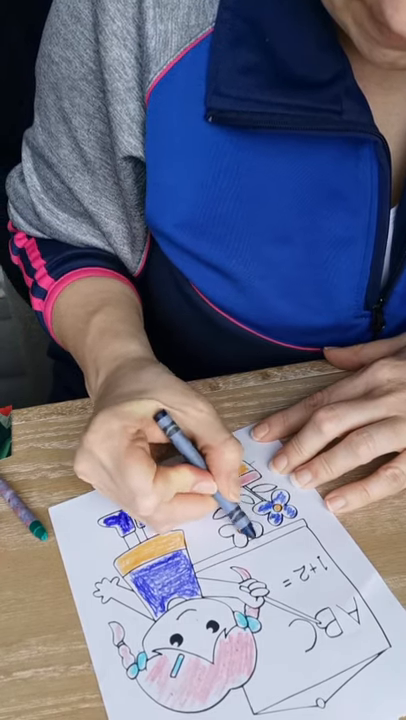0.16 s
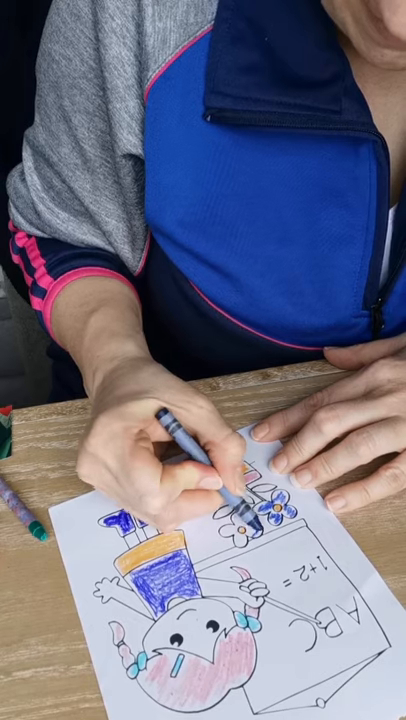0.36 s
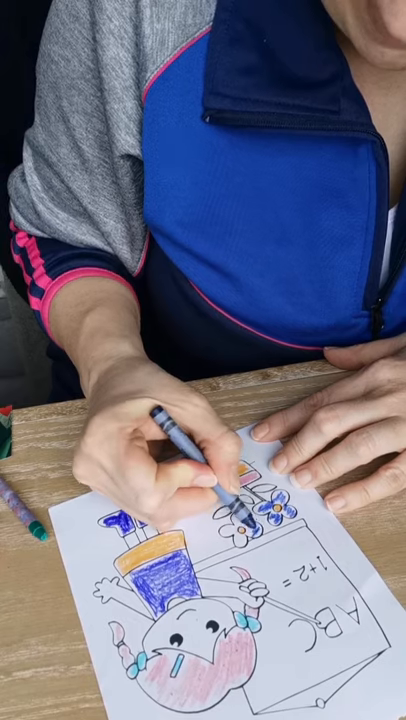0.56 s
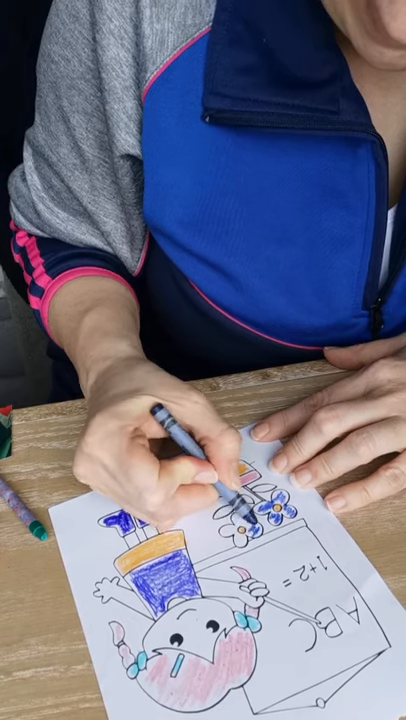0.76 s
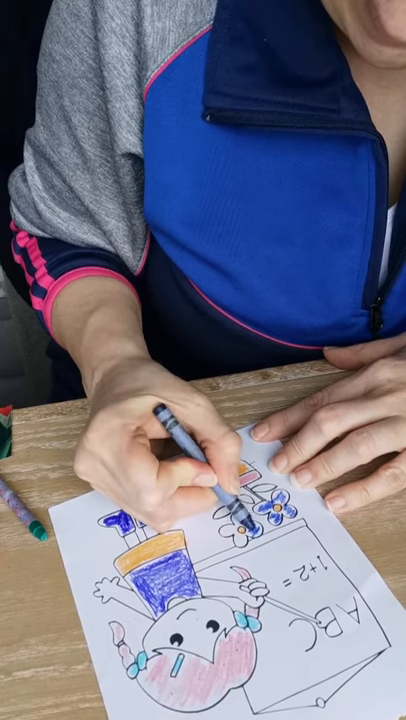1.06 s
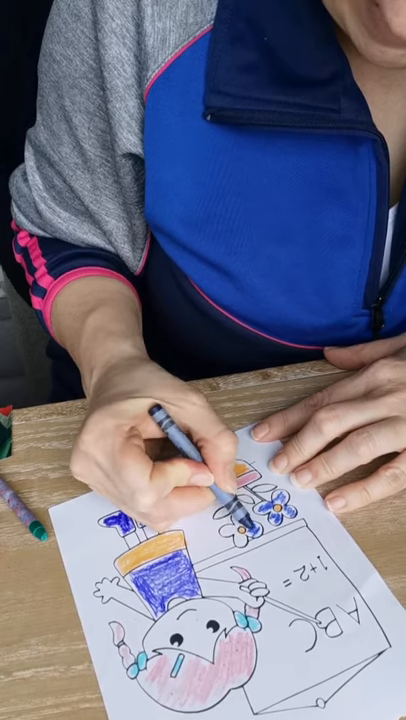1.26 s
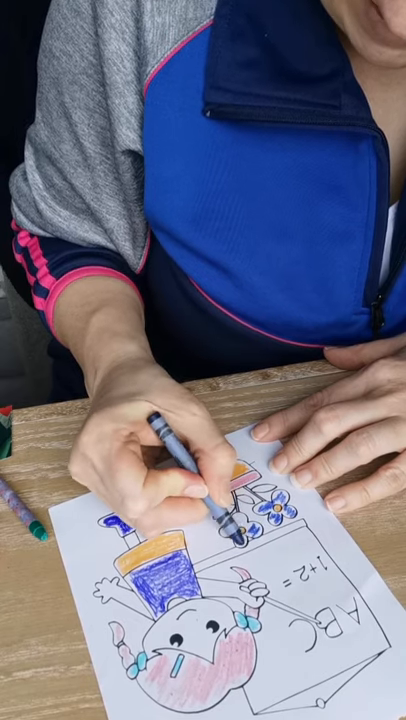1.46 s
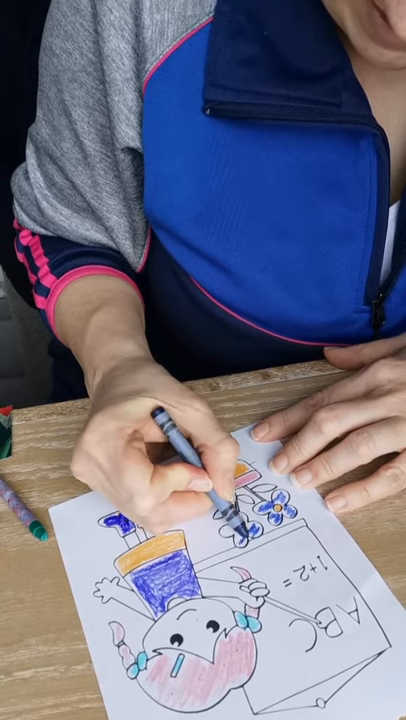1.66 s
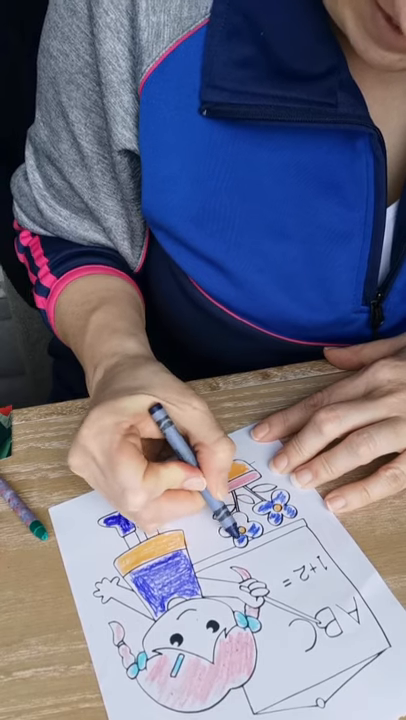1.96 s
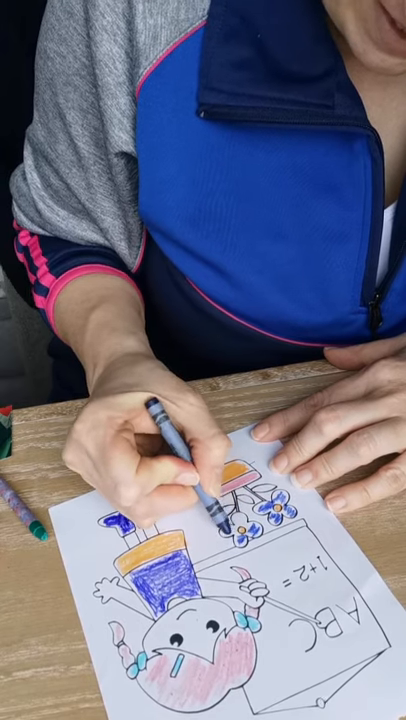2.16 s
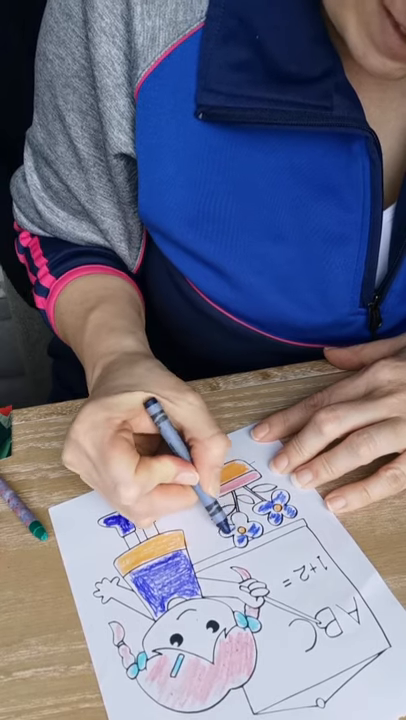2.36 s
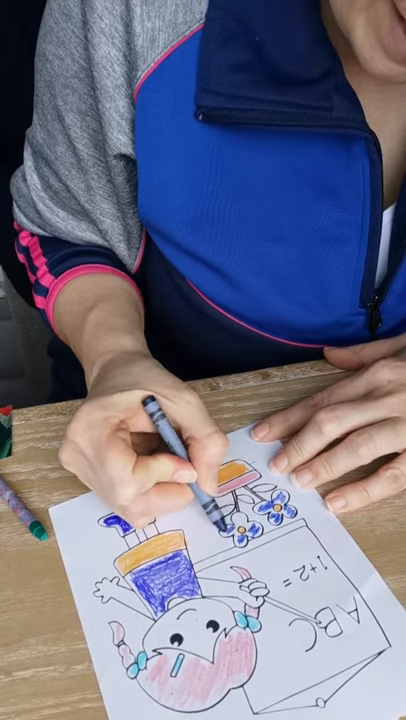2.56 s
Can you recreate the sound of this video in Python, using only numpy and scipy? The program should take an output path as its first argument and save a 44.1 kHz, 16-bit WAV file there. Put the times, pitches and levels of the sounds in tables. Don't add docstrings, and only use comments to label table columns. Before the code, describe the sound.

Crayon rubbing rapidly back and forth on paper, with three small taps on a wooden desk

```python
import sys
import numpy as np
from scipy import signal
from scipy.fft import rfft, irfft
from scipy.io import wavfile

SR = 44100
rng = np.random.default_rng(int(sys.argv[2]) if len(sys.argv) > 2 else 0)


def int16_out(signal):
    q = np.round(np.clip(np.atleast_2d(signal).T, -1, 1) * 32767)
    wavfile.write(sys.argv[1], SR, q.astype(np.int16))


def boost(x):
    u = np.asarray(x, float) / 20
    return 10 ** u


N = 119070

# start [t/s], length [t/s], hiss [level/dB], desk shake [level/dB]
STROKES = [(0, 0.046, -72.5, -54), (0.08, 0.11, -73.5, -62), (0.258, 0.068, -71, -37),
           (0.345, 0.076, -62.5, -44), (0.413, 0.12, -78, -53.5), (0.527, 0.078, -67, -52),
           (0.593, 0.095, -70.5, -68), (0.697, 0.068, -65.5, -50), (0.75, 0.11, -72, -59.5),
           (0.867, 0.082, -63.5, -49.5), (0.977, 0.057, -70.5, -45.5), (1.062, 0.036, -74, -64),
           (1.135, 0.078, -72.5, -49.5), (1.215, 0.062, -74.5, -54), (1.303, 0.071, -68.5, -61),
           (1.371, 0.039, -70, -52.5), (1.614, 0.062, -63, -41), (1.682, 0.11, -73, -56),
           (1.805, 0.068, -62.5, -46.5), (1.876, 0.11, -70.5, -57.5), (1.975, 0.065, -62, -49.5),
           (2.067, 0.069, -69.5, -65), (2.15, 0.04, -71.5, -44), (2.189, 0.098, -66, -52.5),
           (2.368, 0.077, -66.5, -43), (2.44, 0.11, -66.5, -61.5), (2.554, 0.094, -64, -48.5),
           (2.642, 0.071, -65, -61)]
STROKE_HUM_DB = [-0.5, 3, -4.5, -7.5, -1.5, -3, 1.5, 0.5, 4, 0, -4.5, 3, 0.5, 3.5, -2.5, -17, -1.5, 4.5,
                 -3.5, -1, -2.5, 0.5, -4, -6.5, 1, 0.5, -2, 0.5]
STROKE_WEIGHT_DB = [-49, -61, -43, -55, -53, -58, -65, -63, -70, -70, -64, -54, -58, -62, -62, -71, -51,
                    -54, -53, -63, -48, -61, -53, -69, -56, -66, -51.5, -65]
# [f/Hz], [level/dB]
SLIDE_COLOUR = [(530, -53), (900, -36), (1150, -10.5), (1260, -21), (2120, -15), (4740, -9.5), (6560, -6),
                (11800, -10), (16000, -9)]
# [f/Hz], [level/dB]
HISS_COLOUR = [(760, -27), (1300, 3), (1800, -2), (2040, -3.5), (3560, -8), (6910, -2), (16000, -6.5)]
# [f/Hz], width [f/Hz], [level/dB]
SHEET = [(4360, 270, 2), (4690, 150, -5.5), (5290, 160, -4.5), (6730, 330, 0.5), (7100, 240, 2),
         (7490, 150, -1), (8300, 370, -6.5), (11180, 720, -2.5)]
# [f/Hz], width [f/Hz], [level/dB]
CRAYON_HUM = [(609, 69, 0.5), (1176, 50, 7.5), (1678, 24, 0.5), (2072, 73, 0.5), (2337, 32, 0.5),
              (1610, 3800, -11.5)]
# [t/s], desk [level/dB], crayon [level/dB], snap [level/dB], hardness [f/Hz]
TAPS = [
    (0.1999, -30, -37.5, -47, 3500),
    (1.5338, -31.5, -35.5, -45.5, 5900),
    (2.3257, -33.5, -43, -55.5, 2440),
]
# [t/s], [level/dB], centre [f/Hz]
JOLTS = [(.003, -56.5, 109.5), (.15, -58, 143), (0.256, -57, 95), (.295, -52, 95), (0.356, -47, 191),
         (.365, -45, 94), (.449, -44, 98), (0.544, -55, 210), (0.569, -51, 107), (.65, -65, 99),
         (.696, -43.5, 113), (.716, -49, 174), (0.758, -50, 110), (0.867, -46.5, 137), (.91, -48, 162),
         (.935, -49, 190), (.969, -42, 125), (.994, -50, 125), (1.029, -49, 111), (1.061, -55, 108),
         (1.133, -48, 122), (1.157, -52, 136), (1.18, -52, 134), (1.239, -54.5, 129), (1.3, -52, 116),
         (1.367, -59, 121), (1.418, -65, 124), (1.621, -44, 136), (1.644, -44.5, 100), (1.674, -50, 115),
         (1.801, -47.5, 110.6), (1.838, -51.5, 150), (1.891, -55.5, 135), (1.972, -58.5, 100),
         (2.0, -56.5, 153), (2.017, -51, 111), (2.048, -55.5, 100), (2.153, -48, 178), (2.182, -45, 128),
         (2.213, -52.5, 152), (2.239, -53.5, 159), (2.375, -36, 109), (2.417, -60, 101),
         (2.455, -55.5, 193), (2.559, -51, 118), (2.582, -50.5, 112), (2.612, -53.5, 140),
         (2.641, -59, 132)]
# [f/Hz], tapped [level/dB], rubbed [level/dB], time to fall 60 dB [t/s],
# change from tap to tap as the tip moves along [level/dB]
DESK = [(100.8, -10, -8.5, 0.26, 0), (104.3, -33, -1.5, 0.15, 15), (134.2, -4, -4, 0.39, 2),
        (165.5, -11.5, -1, 0.044, 0), (186.9, -10.5, -11, 0.39, 3), (211.7, 0, -8, 0.15, 0.5),
        (258.4, -4.5, -41, 0.084, 1), (343.4, -12.5, -10.5, 0.097, -0.5), (367.5, -1.5, -10, 0.051, 1.5),
        (427, -26, -7.5, 0.048, -11), (575, -7, -4.5, 0.1, 0), (695, -8, -16, 0.05, 1),
        (748, -4, -2, 0.053, 1.5), (847, -7.5, -1.5, 0.049, 1)]
# [f/Hz], [level/dB], time to fall 60 dB [t/s], change from tap to tap [level/dB]
CRAYON_RING = [(1169, -0.5, 0.045, 4), (1310, -14, 0.03, -11), (1612, 8, 0.015, 0), (2085, 1, 0.057, 4.5),
               (2113, 3, 0.03, -0.5), (2316, 8.5, 0.033, -1), (2565, 2, 0.023, 3), (2770, 2, 0.024, .5),
               (3157, -2, 0.028, 2), (3340, -17, 0.015, 1), (4305, 3.5, 0.024, -6), (4720, 2, 0.032, 5),
               (5270, -5.5, 0.066, -18), (7080, 14, 0.014, -1)]
# middle [t/s], [level/dB], centre [f/Hz], length [t/s]
CRACKLES = [
    (0.58, -51, 11900, 0.0071),
    (0.599, -59, 10400, 0.0053),
    (1.504, -57, 12200, 0.004),
    (2.204, -67, 5000, .008),
    (2.417, -50.5, 8200, .014),
    (2.56, -70, 3980, 0.0072),
    (2.611, -50, 7000, 0.012),
]
# [f/Hz], [level/dB]
AIR_COLOUR = [(35, -36), (60, 8), (540, -14), (882, -16), (1550, -19), (3040, -21.5), (3580, -22),
              (6000, -27.5), (16000, -24)]
# [f/Hz], [level/dB], time to fall 60 dB [t/s]
TAIL = [(382, -11.5, 0.2), (690, -22.5, 0.31), (1144, -14, 0.13), (1730, -23.5, 0.21), (2440, -23, 0.24),
        (3520, -20, 0.15), (5060, -24, 0.21), (8900, -80, .15)]
# [f/Hz], [level/dB]
LEFT_COLOUR = [(300, -1), (700, -6.5), (1290, -15), (2380, -10), (4400, -9), (8120, -18.5), (15000, -16)]

AIR_DB, SWAY_FOLLOW_DB = -68.5, -1
SWAY_HZ, SWAY_WIDTH_HZ, SWAY_DB = 45.9, 6.9, -61
RISE_S, FALL_S, SWELL_DB = 0.015, 0.028, 4
GRAINS_PER_S, GRAIN_SPREAD_DB, PATCHY_DB = 6000, -3.5, 1.3
SCRAPE_DB = -7
JOLT_HZ, JOLT_WIDTH, JOLT_EDGE_DB = 308, 0.82, -22
STUTTER_HZ, STUTTER_DB = 264, -53.5
TAP_HZ, DESK_CUT_HZ, SHARED_BELOW_HZ = 984, 74.7, 240
PRESSED_DAMPING = 0.67
ROOM_T60_S, WALL_HZ, ROOM_DB = 0.4, 3500, -21.5
SLIDE_START_S, SLIDE_LENGTH_S, SLIDE_DB = 0.042, 0.13, -49.5
SLIDE_RISE_S, SLIDE_FALL_S = 0.029, 0.063
TAP_SCATTER_DB, SECOND_TOUCH_S, SECOND_TOUCH_DB = 0.8, 0.0016, -9
SNAPS_PER_S, SNAP_SPREAD_DB, SNAP_WIDTH = 20000, 1.5, 0.55
LEFT_LAG_S, DESK_LAG_S = 0.000382, 0.0001
DESK_LEFT_DB, HIGH_DESK_LEFT_DB, OWN_LEFT_DB = 1.38, -5.5, -5.5
TOP_HZ = 15900


def rms_one(x):
    return x / np.sqrt(np.mean(x ** 2) + 1e-20)


def drift(rate):
    r = np.exp(-80 * np.pi * rate / SR)
    slow = signal.lfilter([1], [1, -2 * r, r * r], rng.standard_normal(N // 40 + 2002))[2000:]
    return np.interp(np.arange(N) / 40, np.arange(len(slow)), rms_one(slow))


def colour(x, points):
    hz, db = np.transpose(points)
    f = np.maximum(np.arange(N // 2 + 1) * SR / N, 1)
    gain = boost(np.interp(np.log(f), np.log(hz), db))
    return irfft(rfft(x) * gain, N)


def ring(x, hz, t60):
    r = boost(-60 / (t60 * SR))
    w = 2 * np.pi * hz / SR
    return signal.lfilter([0, np.sin(w)], [1, -2 * r * np.cos(w), r * r], x + 1e-18)


def resonance(x, hz, width_hz):
    r = np.exp(-np.pi * width_hz / SR)
    top = [(1 - r * r) / 2, 0, (r * r - 1) / 2]
    bottom = [1, -2 * r * np.cos(2 * np.pi * hz / SR), r * r]
    return signal.lfilter(top, bottom, x + 1e-18)


def soften(x, hz):
    r = np.exp(-2 * np.pi * hz / SR)
    return signal.lfilter([(1 - r) ** 2], [1, -2 * r, r * r], x + 1e-18)


def shape(start, length, rise, fall):
    out = np.zeros(N)
    first = max(int(start * SR), 0)
    t = np.arange(first, min(int((start + length) * SR), N)) / SR - start
    ramp = np.clip(np.minimum(t / rise, (length - t) / fall), 0, 1)
    out[first:first + len(t)] = np.sin(np.pi / 2 * ramp) ** 2
    return out


def clicks(s, db):
    out = np.zeros(N)
    out[(np.asarray(s) * SR).astype(int)] = boost(np.asarray(db))
    return out


def grains(rate, spread_db):
    sizes = boost(spread_db * np.minimum(rng.exponential(1, N), 5)) * rng.choice([-1, 1], N)
    return rms_one(sizes * (rng.random(N) < rate / SR))


def later(x, s):
    return np.interp(np.arange(N) - s * SR, np.arange(N), x)


def air():
    one, left, right = rng.standard_normal((3, N))
    low = soften(one, 380)
    both = np.array([low + v - soften(v, 600) for v in (left, right)])
    tone = boost(AIR_DB + 0.54 * drift(27)) * rms_one(colour(both, AIR_COLOUR))

    push = sum(boost(weight_db + SWAY_FOLLOW_DB) * shape(start, length, 0.023, 0.024)
               for (start, length, _, _), weight_db in zip(STROKES, STROKE_WEIGHT_DB))
    wobble = np.sign(resonance(one[::-1], SWAY_HZ, SWAY_WIDTH_HZ)) * np.sqrt(SWAY_WIDTH_HZ / SR)
    drive = (boost(SWAY_DB + 2.0 * drift(3.2)) + push) * wobble
    sway = resonance(resonance(drive, SWAY_HZ, SWAY_WIDTH_HZ), SWAY_HZ, 3.9 * SWAY_WIDTH_HZ)
    sway = sway * np.sqrt(SR / SWAY_WIDTH_HZ) * 0.52
    sway = sway + 0.22 * np.roll(sway, SR) * [[1], [-1]]
    return tone + sway * boost(np.array([[0.8], [0]]))


def rubbing():
    t = np.arange(N) / SR
    pressure = np.zeros(N)
    for start, length, db, _ in STROKES:
        swell_db = SWELL_DB * np.clip((t - start) / length - 0.5, -1, 1)
        pressure += boost(db + swell_db) * shape(start, length, RISE_S, FALL_S)
    tooth = colour(grains(GRAINS_PER_S, GRAIN_SPREAD_DB), HISS_COLOUR)
    broad = np.zeros(N)
    for k, hz in enumerate(np.geomspace(1200, 15500, 11)):
        broad += (-1) ** k * boost(PATCHY_DB * drift(8.6)) * resonance(tooth, hz, 0.42 * hz)
    sheet = sum(boost(db + 2.7 * drift(7.4)) * resonance(tooth, hz, width) for hz, width, db in SHEET)
    return pressure * boost(0.5 * drift(100)) * rms_one(0.68 * broad + sheet)


def scraping():
    push = sum(boost(0.59 * hiss_db + 0.39 * shake_db + hum_db) * shape(start, length, 0.014, 0.022)
               for (start, length, hiss_db, shake_db), hum_db in zip(STROKES, STROKE_HUM_DB))
    tooth = grains(3000, 2.47)
    hum = sum(boost(db + 2.0 * drift(15.5)) * resonance(tooth, hz, width) for hz, width, db in CRAYON_HUM)
    return boost(SCRAPE_DB) * push * rms_one(hum)


def desk():
    push = sum(boost(db) * shape(start, length, 0.0077, 0.052) for start, length, _, db in STROKES)
    rub = boost(STUTTER_DB) * push * rms_one(soften(grains(600, 0.56), STUTTER_HZ))
    rub -= boost(JOLT_EDGE_DB) * soften(clicks(*np.transpose(JOLTS)[:2]), JOLT_HZ)
    for s, db, hz in JOLTS:
        rub -= resonance(resonance(clicks([s], [db]), hz, JOLT_WIDTH * hz), hz, JOLT_WIDTH * hz)

    tap_s, tap_level_db = np.transpose(TAPS)[:2]
    place = np.arange(len(tap_s)) - 1
    out = np.zeros((2, N))
    for hz, tap_db, rub_db, t60, move_db in DESK:
        row = int(hz > SHARED_BELOW_HZ)
        tap = -soften(clicks(tap_s, tap_level_db + move_db * place), TAP_HZ)
        out[row] += ring(boost(tap_db) * tap, hz, t60)
        out[row] += ring(boost(rub_db) * rub, hz, PRESSED_DAMPING * t60)
    return signal.sosfilt(signal.butter(3, DESK_CUT_HZ, "high", fs=SR, output="sos"), out)


def room(x):
    out = np.zeros((2, N))
    dull = np.exp(-2 * np.pi * WALL_HZ / SR)
    for k, lag in enumerate((rng.uniform(0.0072, 0.04, 16) * SR).astype(int)):
        loop, state = x.copy(), [0.]
        gain = boost(-60 * lag / SR / ROOM_T60_S)
        for i in range(lag, N, lag):
            back, state = signal.lfilter([gain * (1 - dull)], [1, -dull], loop[i - lag:i], zi=state)
            loop[i:i + lag] += back[:N - i]
        out[k % 2] += (loop - x) * (-1) ** (k // 2)
    return out


def slide():
    hiss = colour(rng.standard_normal(N), SLIDE_COLOUR)
    hiss = (hiss + 1.26 * resonance(hiss, 6730, 840) + 1.1 * resonance(hiss, 11500, 830)
            + 2.1 * resonance(hiss, 1148, 77))
    movement = shape(SLIDE_START_S, SLIDE_LENGTH_S, SLIDE_RISE_S, SLIDE_FALL_S)
    return boost(SLIDE_DB + 0.98 * drift(40)) * movement * rms_one(hiss)


def crayon_taps():
    spread = rng.normal(0, 1, (len(TAPS), len(CRAYON_RING)))
    out = np.zeros(N)
    for k, (hz, mode_db, t60, move_db) in enumerate(CRAYON_RING):
        hit = np.zeros(N)
        for i, (s, _, db, _, hard_hz) in enumerate(TAPS):
            levels = [db + TAP_SCATTER_DB * spread[i, k], db + SECOND_TOUCH_DB]
            touches = clicks([s, s + SECOND_TOUCH_S], levels)
            hit += touches * boost(move_db * (i - 1)) / (1 + (hz / hard_hz) ** 6)
        out -= boost(mode_db) * ring(hit, hz, t60)
    s, _, _, snap_db, _ = np.transpose(TAPS)
    dying = signal.lfilter([1], [1, -boost(-60 / (0.055 * SR))], clicks(s, snap_db))
    snap = dying * rng.standard_normal(N)
    return soften(out, 6200) + resonance(snap, 5200, 8200)


def tap_tail():
    out = np.zeros((2, N))
    white = rng.standard_normal((2, N))
    for hz, band_db, t60 in TAIL:
        start = sum(clicks([s], [db]) / (1 + (hz / hard_hz) ** 6) for s, db, _, _, hard_hz in TAPS)
        dying = soften(signal.lfilter([1], [1, -boost(-60 / (t60 * SR))], start + 1e-18), 135)
        band = resonance(resonance(white, hz, 0.62 * hz), hz, 0.62 * hz)
        out += boost(band_db + 2.0 * drift(36)) * dying * rms_one(soften(band, 2.45 * hz))
    return out


def crackles():
    snaps = grains(SNAPS_PER_S, SNAP_SPREAD_DB)
    snaps = snaps + 1.5 * resonance(snaps, 6700, 900) + 2.0 * resonance(snaps, 12200, 1200)
    out = np.zeros(N)
    for s, db, hz, length in CRACKLES:
        band = resonance(resonance(snaps, hz, SNAP_WIDTH * hz), hz, 2 * SNAP_WIDTH * hz)
        out += boost(db) * shape(s - length / 2, length, length / 2, length / 2) * rms_one(band)
    return out


def scene():
    low, high = desk()
    near = rubbing() + slide() + crackles() + crayon_taps() + scraping()
    left = later(colour(near, LEFT_COLOUR), LEFT_LAG_S)
    left += boost(HIGH_DESK_LEFT_DB) * later(high, DESK_LAG_S) + boost(DESK_LEFT_DB) * low
    left += boost(OWN_LEFT_DB) * resonance(rubbing() + slide(), 4000, 4000)
    right = near + low + high
    return np.array([left, right]) + boost(ROOM_DB) * room(near + high) + tap_tail() + air()


def roll_off(x):
    return signal.sosfilt(signal.butter(12, 16460, fs=SR, output="sos"), x)


def record(dry):
    bass_cut = signal.butter(1, 25, "high", fs=SR, output="sos")
    top_cut = signal.cheby2(16, 60, TOP_HZ * 1.018, fs=SR, output="sos")
    mix = signal.sosfilt(np.vstack([bass_cut, top_cut]), dry)
    return roll_off(mix)


dry = scene()
out = record(dry)
int16_out(out)
```